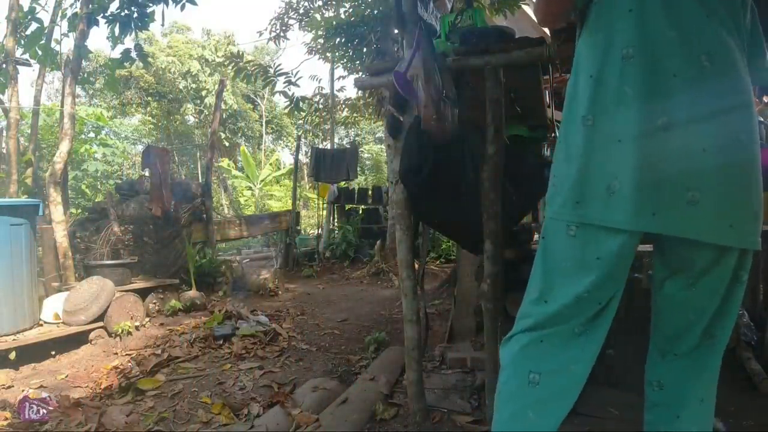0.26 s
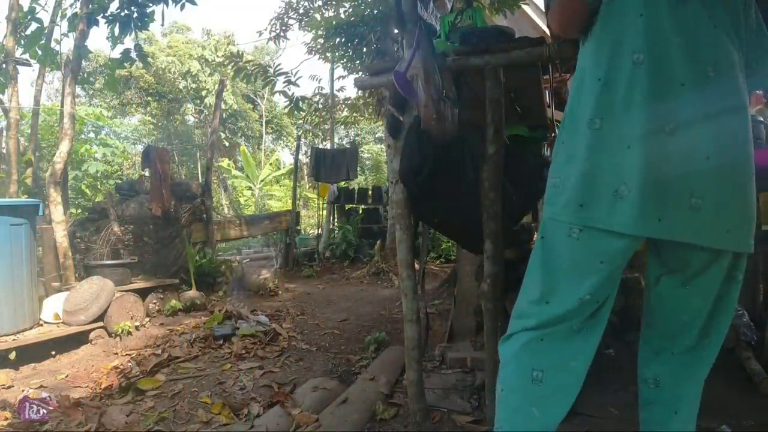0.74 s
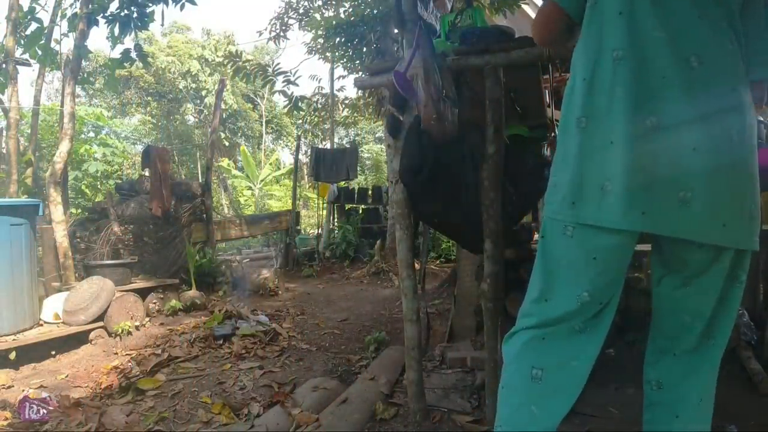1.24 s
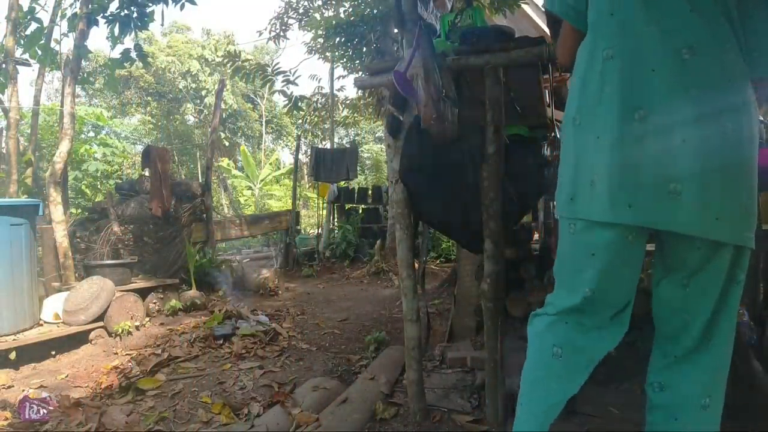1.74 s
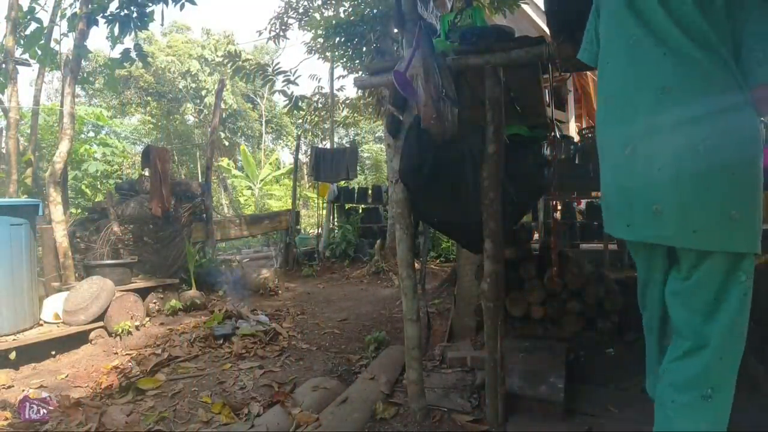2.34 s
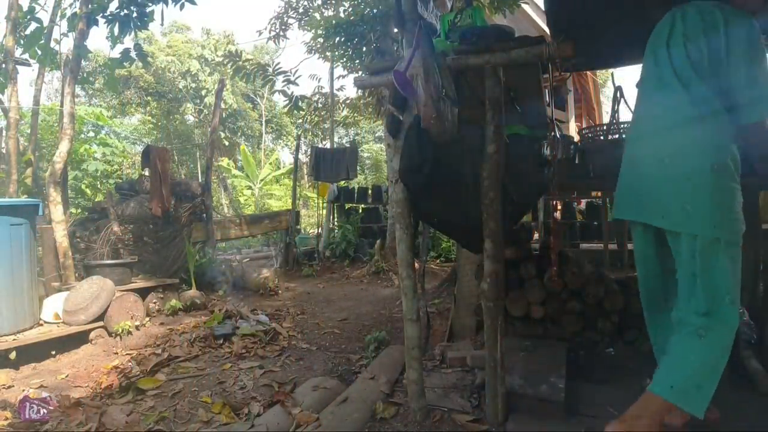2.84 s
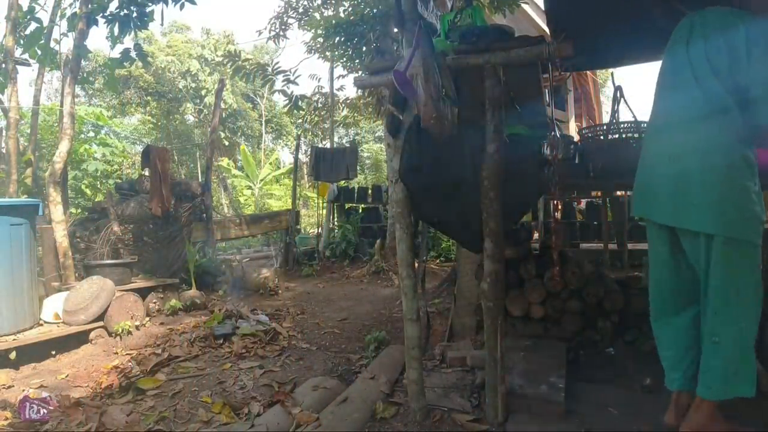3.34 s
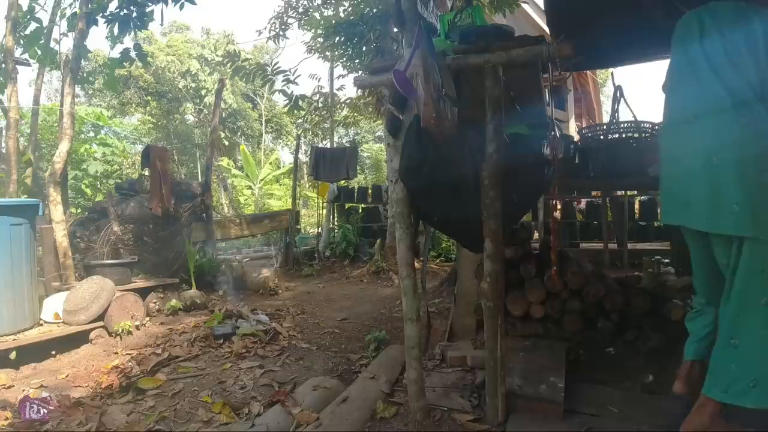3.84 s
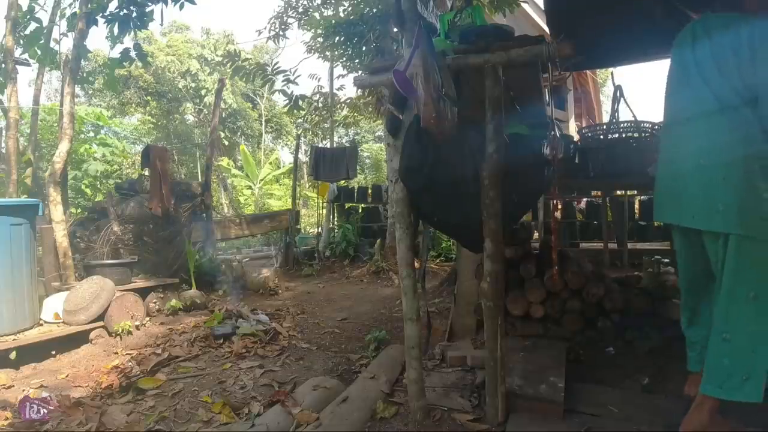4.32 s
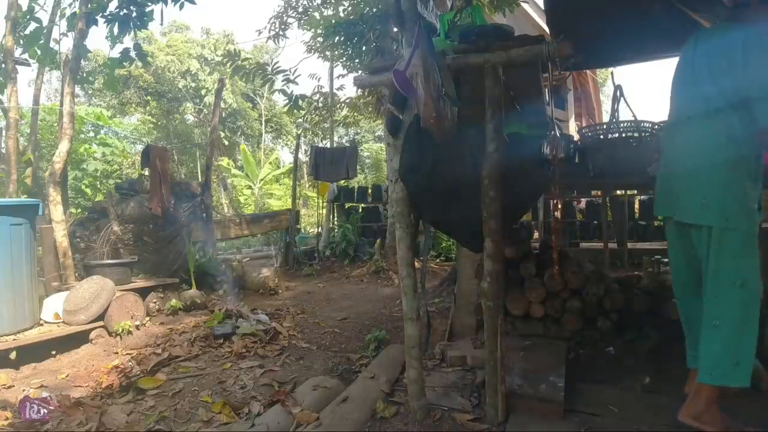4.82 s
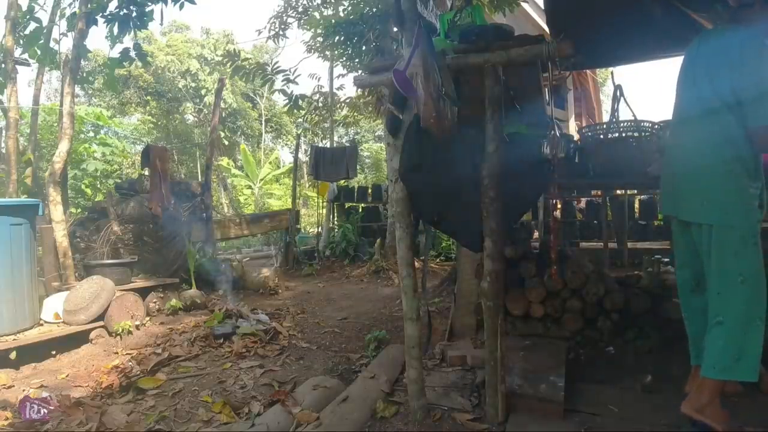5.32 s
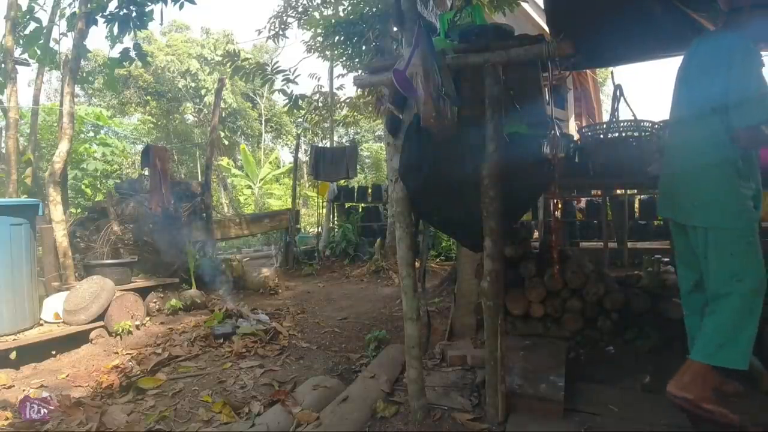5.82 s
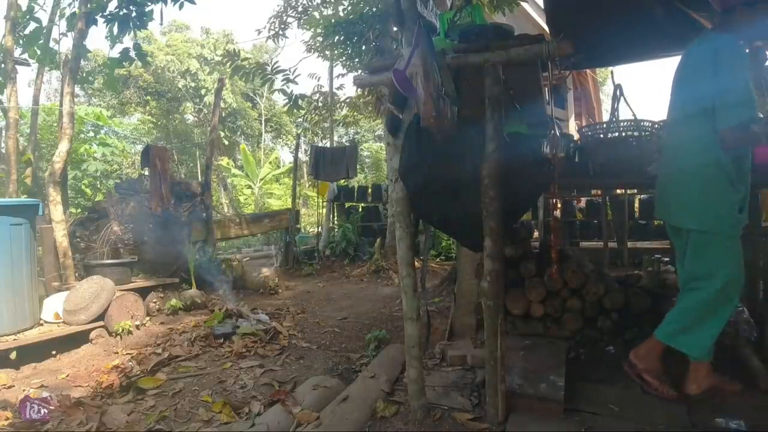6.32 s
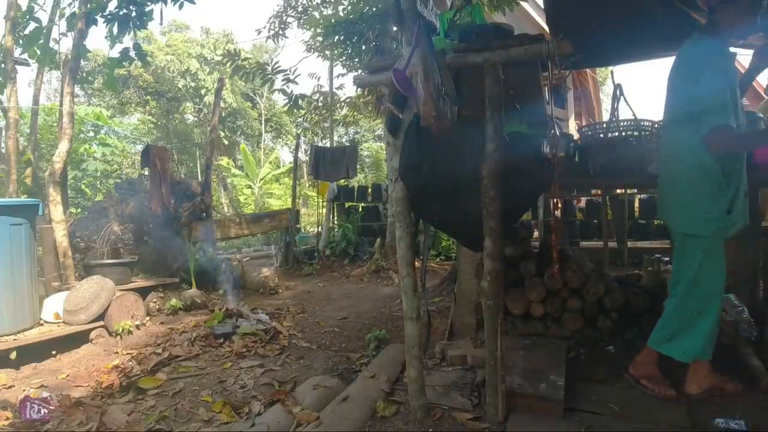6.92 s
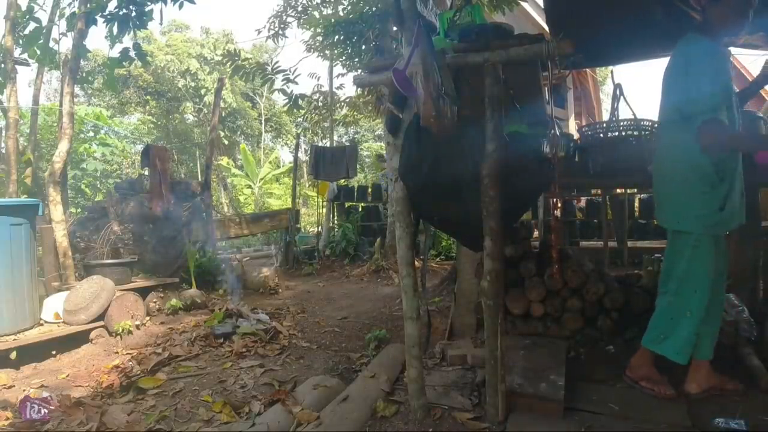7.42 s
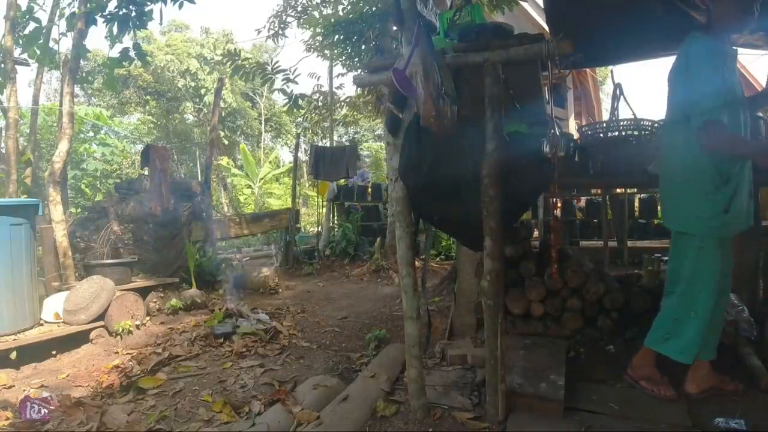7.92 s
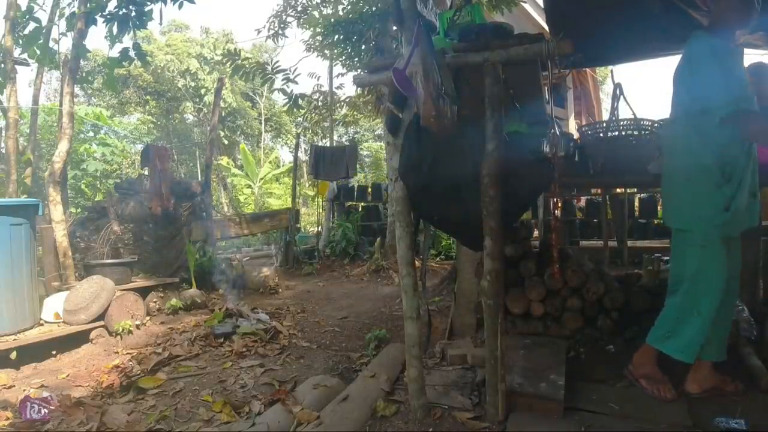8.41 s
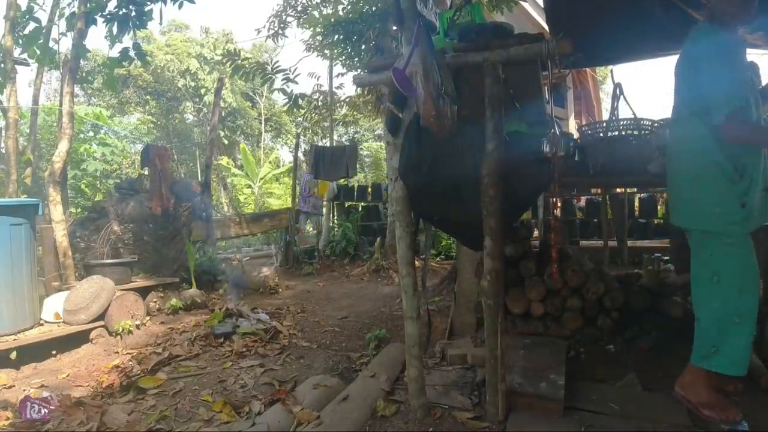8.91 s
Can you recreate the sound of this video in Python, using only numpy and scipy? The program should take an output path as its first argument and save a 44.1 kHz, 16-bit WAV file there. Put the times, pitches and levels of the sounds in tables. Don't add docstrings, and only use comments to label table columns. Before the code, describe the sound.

Outdoors in a quiet yard, dry bristly strokes rasp over soil, short and regular, with bright hissing ends and low earthy scuffs. Early light wood rattles lead to a gap with one strong hollow clack, then even sweeping continues with small knocks, snapping leaves and another firm knock near the end. Close stereo pickup, little reverberation, with faint high insects and a very low distant engine behind.

```python
import sys
import numpy as np
from scipy import signal
from scipy.fft import rfft, irfft, next_fast_len
from scipy.io import wavfile
from scipy.ndimage import uniform_filter1d, map_coordinates

SR = 44100
rng = np.random.default_rng(int(sys.argv[2]) if len(sys.argv) > 2 else 0)


def int16_out(signal):
    q = np.round(np.clip(np.atleast_2d(signal).T, -1, 1) * 32767)
    wavfile.write(sys.argv[1], SR, q.astype(np.int16))


def volts_from_db(level):
    exponent = np.asarray(level, float) / 20
    return 10 ** exponent


N = 403956


def unit(x):
    return x / np.sqrt(np.mean(x ** 2) + 1e-20)


def along(points, hz):
    point_hz, value = np.transpose(points)
    return np.interp(np.log(hz + 1), np.log(point_hz + 1), value)


def curves(rows):
    s, *columns = np.transpose(rows)
    return [np.interp(np.arange(N) / SR, s, column) for column in columns]


def wobble(rate):
    knots = rng.standard_normal(int(N * rate / SR) + 4)
    return map_coordinates(knots, [np.arange(N) * rate / SR])


def filtered(x, response):
    size = next_fast_len(N + 8192)
    return irfft(rfft(x, size) * response(np.fft.rfftfreq(size, 1 / SR)), size)[..., :N]


def coloured(pair, spectrum):
    return unit(filtered(pair, lambda hz: volts_from_db(along(spectrum, hz))))


def bursts(rows, rise_s, fade_db_per_s, rest_db):
    t = np.arange(0, N + 32, 32) / SR
    level = np.full(len(t), float(rest_db))
    for s, hold, db in rows:
        rise = rest_db + (db - rest_db) * (t - s) / rise_s
        fade = db - fade_db_per_s * np.maximum(t - s - rise_s - hold, 0)
        level = np.maximum(level, np.minimum(rise, fade))
    return np.interp(np.arange(N) / SR, t, level)


def slips(per_s, spread_db, smooth, patchy_db):
    times = rng.random(N) < per_s / SR
    size = times * volts_from_db(spread_db * np.minimum(rng.exponential(size=N), 4))
    rub = unit(size * rng.standard_normal((2, N))) + smooth * rng.standard_normal((2, N))
    z = signal.stft(rub, nperseg=512)[2]
    field = uniform_filter1d(rng.standard_normal(z.shape[1:]), size=3, axis=0)
    field = uniform_filter1d(field, size=5, axis=1)
    return signal.istft(z * volts_from_db(patchy_db * unit(field)), nperseg=512)[1][:, :N]


REST_DB = -76.5

# landing in seconds, contact in seconds, push in dB, first touch in dB,
# swell to the full push in seconds.
STROKES = [(-.03, 0.3, -41.5, -49, 0.12), (0.497, 0.2, -42.5, -48, 0.16), (.70, 0.18, -41.5, -48.5, 0.18),
           (1.155, 0.28, -40, -49, 0.17), (1.738, 0.29, -41.5, -45.5, 0.14), (2.97, 0.25, -39, -42, 0.18),
           (3.64, 0.28, -39.5, -44.5, 0.1), (4.314, 0.26, -41, -42.5, 0.17),
           (4.838, 0.05, -47, -50.5, 0.03), (4.883, 0.28, -40.5, -43, 0.11), (5.478, 0.296, -39, -45, 0.14),
           (6.108, 0.28, -38.5, -47, 0.12), (6.757, 0.3, -40.5, -42, 0.37), (7.332, 0.31, -39, -48.5, 0.24),
           (7.943, 0.29, -42, -50.5, 0.093), (8.585, .22, -40.5, -53.5, 0.19),
           (9.091, 0.36, -42, -51.5, 0.068)]
# tips over twigs in dB, dulling of the tips in dB per second,
# soil in dB, handle in dB, trailing off in dB per second.
LEANS = [(7, 36, -8.5, 3.5, 112), (1.5, 25, -4.5, 6.5, 110), (3, -14, -9, 6.5, 100), (2, -7, -8.5, 5, 91),
         (5, 6, -9, 4.5, 116), (4, -1, -17, -1.5, 105), (4, -2, -17.5, 1.5, 114), (5.5, -7, -20, 0, 108),
         (2, 0, -18, 0, 100), (5.5, 3, -20, 0, 100), (4, 4, -20.5, -0.5, 82), (4.5, 4, -17, 1.5, 75),
         (5.5, -11, -15, -2, 100), (4, -5, -15.5, 1.5, 92), (6.5, 12, -12.5, 1.5, 107),
         (5, -9, -16, -0.5, 73), (2, 5, -13, -2, 100)]
# settling in seconds, dip of the rebound in dB.
LANDINGS = [(.03, 2.5), (0.081, -0.5), (.04, 0), (0.042, 2), (0.038, 1.5), (0.03, 1), (0.056, -1.5),
            (0.035, 0), (0.032, 0.1), (0.015, 4), (0.042, -1), (0.029, 5), (0.052, 1), (0.042, 1.5),
            (0.027, 2.5), (0.043, 1), (0.053, -2)]


def strokes():
    early, rebound_s = 0.5, 0.048
    sag_db, lift_s, lift_db = 2, 0.049, 6.5
    tips_grow, soil_grows, handle_grows = 0.52, 0.81, 1
    end_db = -sag_db - lift_db
    t = np.arange(N) / SR
    levels = np.full((4, N), -120.)
    for stroke, lean, landing in zip(STROKES, LEANS, LANDINGS):
        s, contact, push_db, touch_db, swell = stroke
        tips_db, dulling, soil_db, handle_db, trail_db_per_s = lean
        settle, dip_db = landing
        age = t - s
        touch = touch_db - push_db
        down = (1 - early) * settle
        lifted = contact + lift_s
        ages = [-1, -early * settle, down, down + rebound_s, min(swell, contact), contact, lifted, lifted + 1]
        pressures = [-120, REST_DB - push_db, touch, 0.56 * touch - dip_db, 0, -sag_db,
                     end_db, end_db - trail_db_per_s]
        twigs = np.interp(age, np.maximum.accumulate(ages), pressures)
        trailing = np.minimum(twigs - end_db, 0)
        tips = twigs + tips_db + tips_grow * trailing - dulling * (age - swell)
        soil = soil_grows * twigs + soil_db
        handle = handle_grows * twigs + handle_db
        levels = np.maximum(levels, push_db + np.array([twigs, tips, soil, handle]))
    return levels


def broom():
    twigs_db, tips_db, soil_db, handle_db = strokes()
    flutter = wobble(70)
    uneven = 0.22 * wobble(16)
    scratch = slips(per_s=5000, spread_db=1.4, smooth=2.1, patchy_db=2.2)
    drag = slips(per_s=1500, spread_db=2.5, smooth=1.68, patchy_db=3.0)
    out = twigs(scratch, twigs_db + uneven + 0.076 * flutter)
    out = out + tips(scratch, tips_db + uneven + 0.17 * flutter)
    out = out + handle(scratch, handle_db) + graze(scratch)
    return out + soil(drag, soil_db) + feet(drag)


# frequency in Hz, level in dB per Hz.
TWIGS = [(300, -66), (700, -40), (1100, -4.5), (1440, -8.5), (1750, -4), (2490, -1), (3610, -1),
         (5020, 0.5), (7210, -4.5), (10500, -7), (12500, -15), (15600, -3.5)]


def twigs(scratch, level_db):
    return volts_from_db(np.maximum(level_db, REST_DB) + 2.5) * coloured(scratch, TWIGS)


# frequency in Hz, level in dB per Hz.
TIPS = [(5000, -48), (9000, -7.5), (11500, -7), (13100, -3), (14900, 4.5), (15500, 1.5)]


def tips(scratch, level_db):
    return volts_from_db(level_db + 0.97 * wobble(260) + 1.0) * coloured(scratch, TIPS)


# frequency in Hz, width in Hz, level in dB.
HANDLE = [(913, 185, -4), (1460, 61, -5)]


def handle(scratch, level_db):
    def wood(hz):
        total = 0
        for centre, width, db in HANDLE:
            resonance = 1j * hz * width / (centre * centre - hz * hz + 1j * hz * width)
            total = total + volts_from_db(db) * resonance ** 2
        return total
    return volts_from_db(level_db - 19.0 + 0.32 * wobble(6.3)) * unit(filtered(scratch, wood))


# start in seconds, hold in seconds, level in dB.
BRUSHES = [
    (2.568, 0.016, -57.5),
    (1.56, 0.039, -61),
    (3.40, 0.022, -56),
    (4.05, 0.025, -75),
    (7.18, 0.03, -68),
    (4.17, 0.015, -61),
    (5.93, 0.038, -58),
    (6.56, 0.051, -62.5),
    (7.78, 0.021, -60),
    (8.915, 0.034, -47),
]
# frequency in Hz, level in dB per Hz.
GRAZE = [(300, -50), (900, -5), (2000, -1), (4500, -7.5), (7000, -6.5), (9500, -7), (11000, -25),
         (15600, -38)]


def graze(scratch):
    level_db = bursts(BRUSHES, rise_s=0.0098, fade_db_per_s=278, rest_db=REST_DB - 8.5)
    return volts_from_db(level_db - 1.0) * coloured(scratch, GRAZE)


# start in seconds, hold in seconds,
# soil level in dB, footfall level in dB.
SCUFFS = [(-.02, 0.034, -51.5, -56), (0.168, 0.033, -55, -57), (0.24, 0.06, -53, -62),
          (0.469, 0.076, -44.5, -51), (1.159, 0.04, -48, -61), (1.43, 0.024, -60, -58),
          (1.732, 0.04, -50, -59), (2.189, 0.05, -60, -75), (2.568, 0.015, -58, -57),
          (2.636, 0.02, -55, -49.5), (2.96, 0.022, -46.5, -51.5), (3.391, 0.031, -49.5, -58),
          (3.578, 0.083, -46.5, -52.5), (4.038, 0.041, -62, -57), (4.157, 0.023, -56, -49.5),
          (4.242, 0.049, -63, -54), (4.303, 0.071, -50, -59), (4.834, 0.021, -53.5, -75),
          (4.896, 0.046, -54, -56), (5.476, 0.027, -52.5, -72), (5.735, 0.044, -56, -60),
          (5.84, 0.15, -65.5, -68), (6.1, 0.03, -52, -60), (6.558, 0.018, -59, -67),
          (6.657, 0.02, -63, -61), (6.749, 0.015, -45, -65), (6.774, 0.047, -39, -63),
          (7.323, 0.012, -46.5, -62), (7.331, 0.033, -38, -58), (7.615, 0.022, -51.5, -75),
          (7.924, 0.014, -56, -57), (8.202, 0.021, -52.5, -61), (8.62, 0.32, -61, -61),
          (8.918, 0.03, -48, -50), (8.999, .16, -55.5, -51)]
# frequency in Hz, level in dB per Hz.
SOIL = [(120, -59), (240, -7), (500, -1), (900, -1), (1250, -2), (1600, -5.5), (2300, -8), (4000, -47)]


def soil(drag, level_db):
    digs_db = bursts(np.array(SCUFFS)[:, :3], rise_s=0.0098, fade_db_per_s=280, rest_db=-72)
    level_db = np.maximum(level_db, digs_db)
    return volts_from_db(level_db + 2.3 * wobble(40) + 0.66 * wobble(15) - 3.0) * coloured(drag, SOIL)


# frequency in Hz, level in dB per Hz.
FEET = [(50, -23), (90, 5), (150, 3), (250, -3.5), (380, -12.5), (600, -47)]
# time in seconds, level in dB.
NEARNESS = [(0, 3), (4.4, 1), (4.6, -9.5), (6.4, -3), (6.7, -1), (7.5, -4.5), (8.2, 5), (9.16, -4.5)]


def feet(drag):
    footfalls = np.array(SCUFFS)[:, [0, 1, 3]]
    level_db = bursts(footfalls, rise_s=0.0098, fade_db_per_s=185, rest_db=-70.5)
    level_db = level_db + 3 * wobble(14) + curves(NEARNESS)[0]
    return volts_from_db(level_db - 6.5) * coloured(drag, FEET)


# start in seconds, peak in dB, low mode in Hz, high mode in Hz, high mode in dB.
KNOCKS = [(0.479, -34.5, 477, 800, 0.5), (0.235, -42, 400, 870, 1), (0.265, -41, 390, 860, -2),
          (0.295, -43, 400, 870, -3), (0.82, -43, 470, 900, -4), (0.513, -30, 474, 1310, -0.5),
          (0.54, -28.5, 430, 860, 1.5), (0.544, -35, 298, 890, 3), (0.569, -36, 410, 876, 7),
          (1.1878, -39, 314, 605, -1), (1.1905, -35.5, 324, 838, 15), (1.222, -41, 400, 850, 9),
          (1.24, -45, 400, 860, 7), (1.74, -41, 332, 1140, -9), (1.771, -38, 290, 950, -1),
          (2.653, -18, 567, 1000, -7.5), (2.658, -14.5, 412, 986, -10), (2.676, -30, 406, 1000, -10),
          (6.766, -39, 615, 1120, 9), (6.773, -39, 610, 870, 10), (6.795, -26, 520, 1000, -6),
          (6.802, -27, 644, 990, -5), (6.813, -30, 565, 1050, -10), (6.824, -31, 622, 1010, -9),
          (8.971, -25, 446, 800, -14), (9.004, -33, 446, 800, -17)]
# start in seconds, peak in dB, low mode in Hz, high mode in
# Hz, high mode in dB.
MORE_KNOCKS = [(2.21, -48, 648, 1240, -3), (2.769, -48, 546, 910, -3), (2.97, -37, 437, 910, 4),
               (3.408, -36, 269, 1180, 2), (3.544, -42, 449, 743, -16), (3.589, -31, 414, 680, -4),
               (3.672, -50.5, 278, 926, 16), (4.033, -33.5, 473, 712, -15), (4.149, -42.5, 248, 1190, -26),
               (4.242, -41, 342, 1020, -7), (0.5, -36.5, 422, 1225, -1), (4.827, -50, 670, 1190, 8),
               (4.851, -39, 810, 1235, 6.5), (4.19, -49, 595, 900, 5), (4.348, -40, 700, 975, 14.5),
               (6.107, -46, 860, 1180, 4), (6.787, -27, 640, 1490, 4.5), (7.211, -50, 417, 1475, 0),
               (7.345, -28, 710, 1055, 4), (7.354, -23.5, 440, 1410, -3), (7.363, -32, 610, 900, 5),
               (7.385, -33, 597, 860, 6), (5.854, -50, 460, 900, -8), (5.95, -54, 430, 1100, -10),
               (8.9535, -19, 540, 760, -9), (8.957, -17, 433, 1500, -20), (9.05, -42, 450, 700, -8),
               (9.09, -42, 470, 700, -8), (9.13, -41, 450, 750, -6), (8.984, -25, 453, 845, -23),
               (9.02, -40, 480, 856, -8)]


def knocks():
    cycles, high_t60_s = 18.2, 0.045
    out = np.zeros(N + SR)
    t = np.arange(SR // 4) / SR
    dull = signal.butter(N=4, Wn=1300, fs=SR)
    for s, db, low_hz, high_hz, high_db in KNOCKS + MORE_KNOCKS:
        fade = volts_from_db(-60 * t * low_hz / cycles) * (1 - np.exp(-t / 0.002)) ** 2
        high = volts_from_db(high_db - 4.5 - 60 * t / high_t60_s) * (1 - np.exp(-t / 0.00079))
        high = high * np.sin(2 * np.pi * high_hz * t)
        ring = np.sin(2 * np.pi * low_hz * t)
        ring += 0.43 * np.sin(2 * np.pi * 0.687 * low_hz * t)
        ring += 0.48 * np.sin(2 * np.pi * 1.214 * low_hz * t)
        puff = 0.69 * signal.lfilter(*dull, rng.standard_normal(len(t)))
        out[round(s * SR):][:len(t)] += volts_from_db(db - 1.8) * (fade * (ring + puff) + high)
    return out[:N]


# start in seconds, peak in dB,
# frequency in Hz, width in octaves, time to fall by 60 dB in seconds.
TICKS = [(2.576, -38, 2980, 0.52, 0.1), (2.58, -44, 2170, 0.3, 0.12), (2.582, -47, 4070, 0.37, 0.17),
         (2.654, -45, 1600, 0.75, 0.07), (4.243, -49, 1200, 0.62, 0.039), (4.305, -43, 1850, 0.18, 0.11),
         (4.319, -37, 1570, 0.65, 0.059), (6.045, -50, 1150, 0.65, 0.04), (6.767, -32.5, 1296, 0.85, 0.066),
         (7.337, -35, 1800, 1.2, 0.056), (1.163, -51, 2500, 1, 0.05), (2.213, -51, 1300, 0.37, 0.04),
         (2.258, -54, 1310, 0.59, 0.087), (6.757, -44, 1300, 1.2, 0.05), (5.493, -39, 14300, 0.2, 0.012),
         (4.893, -37, 14300, 0.2, 0.03), (1.128, -58, 2500, 1.2, 0.012), (5.49, -50, 900, 1.5, 0.07),
         (2.757, -58, 2960, 0.3, 0.06), (2.758, -57, 1390, 0.4, 0.08), (2.903, -54, 1500, 1, 0.02),
         (2.915, -61, 3300, 0.5, 0.11), (2.9033, -42.5, 3000, 0.22, 0.042),
         (3.4103, -42.5, 1880, 1.1, 0.22), (3.5893, -42, 1920, 0.17, 0.051), (3.619, -36, 1920, 0.15, 0.06),
         (4.182, -42.5, 2190, 1, 0.064), (4.847, -54, 1880, 0.66, 0.052), (4.179, -48, 3000, 1.2, 0.03),
         (4.8902, -47, 4450, 0.69, 0.05), (6.787, -33, 1700, 0.8, 0.06), (7.353, -30.5, 4370, 0.34, 0.12),
         (8.0466, -29, 4900, 0.6, 0.066)]


def ticks():
    out = np.zeros(N + SR)
    t = np.arange(SR // 4) / SR
    for s, db, hz, octaves, t60 in TICKS:
        edges_hz = hz * 2 ** (np.clip(octaves, .1, 1.5) * np.array([-.5, .5]))
        band = signal.butter(N=2, Wn=edges_hz, btype="band", fs=SR)
        burst = unit(signal.lfilter(*band, rng.standard_normal(len(t)))) * (1 - np.exp(-t / 0.0012))
        out[round(s * SR):][:len(t)] += volts_from_db(db - 4.5 - 60 * t / max(t60, .01)) * burst
    return out[:N]


# frequency in Hz, time to fall by 60 dB in seconds.
YARD = [(200, 0.07), (2000, 0.21), (10000, 0.08)]


def yard(x):
    hz, t, z = signal.stft(rng.standard_normal((2, SR // 3)), SR, nperseg=256)
    fade = volts_from_db(-60 * t / along(YARD, hz)[:, None])
    tail = signal.istft(z * fade, SR, nperseg=256)[1]
    late = np.pad(x, (200, 0))[None]
    return signal.fftconvolve(late, tail / np.linalg.norm(tail[0]), axes=1)[:, :N]


# frequency in Hz, waver in Hz, wing strokes per second, level in dB.
INSECTS = [
    (4625, 15, 0, -76.5),
    (6500, 110, 0, -75),
    (7050, 25, 150, -78),
    (7570, 25, 100, -78),
    (7320, 30, 0, -79),
    (4550, 60, 0, -80),
    (6750, 40, 0, -78),
]
# start in seconds, hold in seconds, level in dB.
SONGS = [
    [(2.31, 0.16, 1), (2.49, .14, 7), (2.672, 0.045, 10), (2.765, 0.03, 10), (2.795, 0.07, 14.5),
     (2.87, .05, 7), (4.2, 0.12, 9), (5.35, 0.069, 8), (7.24, 0.076, 12), (8.49, 0.11, 10)],
    [(2.2, 0.73, 2.5), (2.55, 0.1, 12), (3, 7.2, 2)],
    [(0, 1.9, 0), (2.05, 0.22, 14.5), (3.4, 0.2, 5), (4.05, .17, 15), (5.9, 0.29, 6), (6.5, 1.7, 11)],
    [(0, 2.2, 3), (1.6, .14, 9), (2.1, 0.24, 10), (2.65, .12, 2), (3.4, 9.3, 7)],
    [(.3, 1.7, 2), (4.2, .12, 11), (5.3, 3.1, 0), (8.38, 0.26, 3)],
    [(2.3, 0.43, 7), (2.6, 6.5, 1)],
    [(5.28, .25, 2), (7.18, 0.16, 7), (8.33, 0.25, 11)],
]


def insects():
    out = np.zeros((2, N))
    t = np.arange(N) / SR
    for (hz, waver_hz, strokes_per_s, db), song in zip(INSECTS, SONGS):
        phase = 2 * np.pi * np.cumsum(hz + waver_hz * wobble(3.5 * waver_hz)) / SR
        trills_db = bursts(song, rise_s=0.013, fade_db_per_s=200, rest_db=-25)
        strength = volts_from_db(db + trills_db + 1.8 * wobble(2.5 * waver_hz))
        if strokes_per_s:
            strength = strength * (0.47 + np.cos(2 * np.pi * strokes_per_s * t + 1.0 * wobble(30)))
        out += strength * np.sin(phase + np.outer([1, -1], 0.84 + 0.15 * wobble(7.5)))
    return out


# time in seconds, firing rate in Hz, level in dB.
ENGINE = [(0.0, 43.8, -42.5), (0.25, 45.5, -51.5), (0.81, 50, -83), (1.33, 48.4, -52.5), (1.5, 51.4, -53),
          (2.19, 50.4, -63), (2.42, 52.6, -53.5), (2.63, 50.3, -52.5), (3.62, 50.6, -49.5),
          (3.95, 47.9, -55), (4.69, 47.8, -54.5), (4.87, 46.3, -55), (5.81, 46.67, -58.5),
          (6.45, 46.55, -53), (7.58, 48.25, -50.5), (8.7, 52.66, -48.5), (8.8, 54.5, -52.5),
          (9.16, 54.6, -45)]


def engine():
    hz, db = curves(ENGINE)
    phase = 2 * np.pi * np.cumsum(hz) / SR
    exhaust = np.sin(phase + 0.5 * wobble(9.3))
    shaft = volts_from_db(-15.5 + 3.8 * wobble(2.5)) * np.sin(1.25 * phase)
    return np.sqrt(2) * volts_from_db(db + 0.25 * wobble(5.5)) * (exhaust + shaft)


# frequency in Hz, level in dB per Hz.
AIR = [(15, -16), (32, -3), (62, -4.5), (92, -10), (136, -19.5), (250, -27.5), (800, -43), (1650, -30),
       (3240, -31), (5500, -41), (7500, -57), (9400, -69), (13000, -56), (14500, -55), (15600, -60)]


def trees_and_air():
    return volts_from_db(-65.0 + 0.55 * wobble(3.4)) * coloured(rng.standard_normal((2, N)), AIR)


# frequency in Hz, likeness from 0 to 1.
ALIKE = [(100, 0.86), (400, 0.89), (1000, 1), (1700, 0.96), (2400, 0.35), (3900, 0), (5200, 0.4),
         (7200, 0.55), (8500, 0.26), (10700, 0.43), (12000, 0.56), (15000, 0.16)]
# frequency in Hz, lag in radians.
LAG = [(100, .05), (350, .2), (700, .6), (1200, 1.1), (2200, 1.5), (3200, .3), (5000, 0)]


def at_ports(pair):
    def shares(hz):
        turn = np.arccos(np.clip(along(ALIKE, hz), 0, 1)) / 2
        return np.array([np.cos(turn), np.sin(turn)])

    def lag(hz):
        return np.exp(.5j * along(LAG, hz) * np.array([[-1], [1]]))

    mid, side = filtered(pair, shares)
    return filtered(np.array([mid + side, mid - side]), lag)


def scene():
    hits = knocks() + ticks()
    near = broom() + np.array([hits, 0 * hits]) + volts_from_db(-14.0) * yard(hits)
    return at_ports(near + trees_and_air()) + insects() + engine()


def roll_off(x):
    return signal.sosfilt(signal.butter(12, 16790, fs=SR, output="sos"), x)


def record(dry):
    top_hz, slope_hz = 15640, 200
    mix = filtered(dry, lambda hz: np.clip((top_hz - hz) / slope_hz, 0, 1))
    return roll_off(mix)


dry = scene()
out = record(dry)
int16_out(out)
```